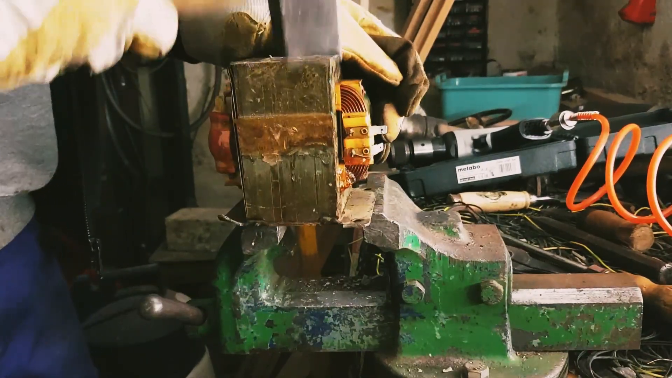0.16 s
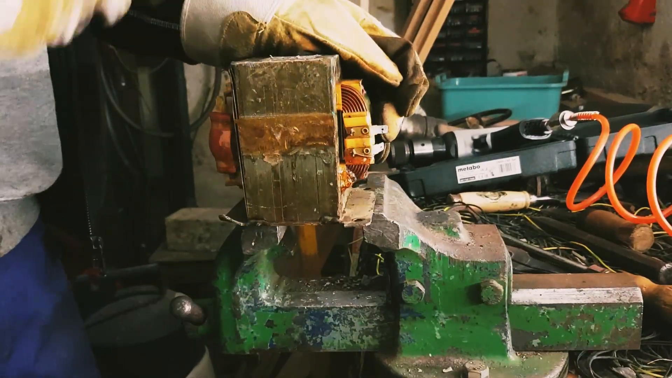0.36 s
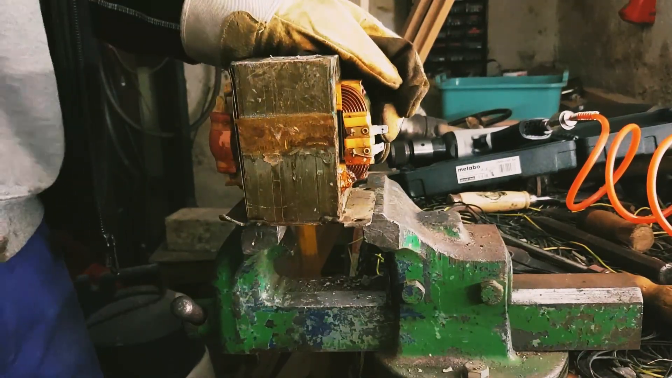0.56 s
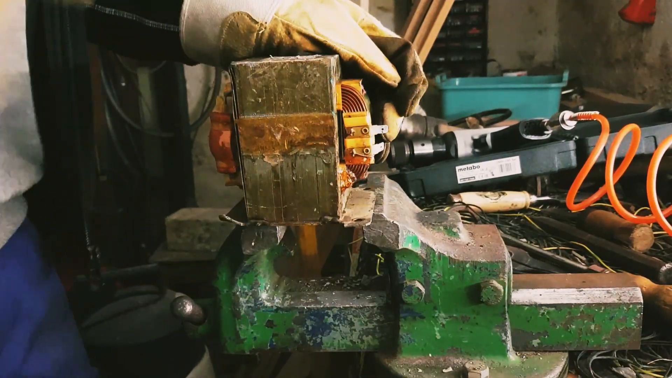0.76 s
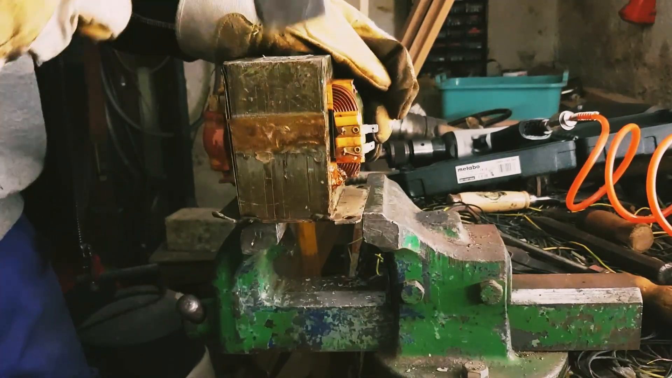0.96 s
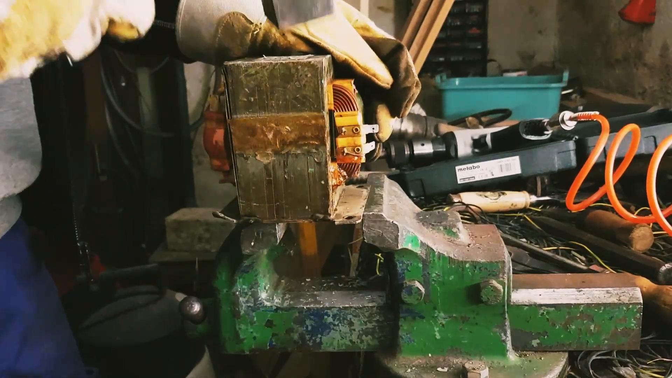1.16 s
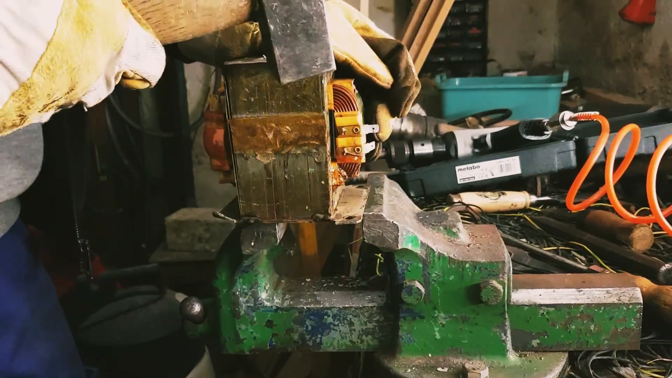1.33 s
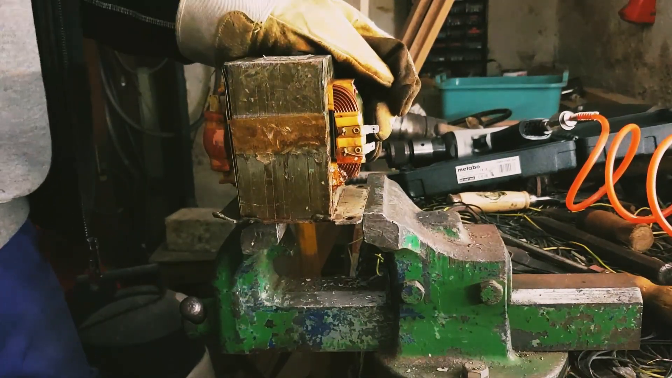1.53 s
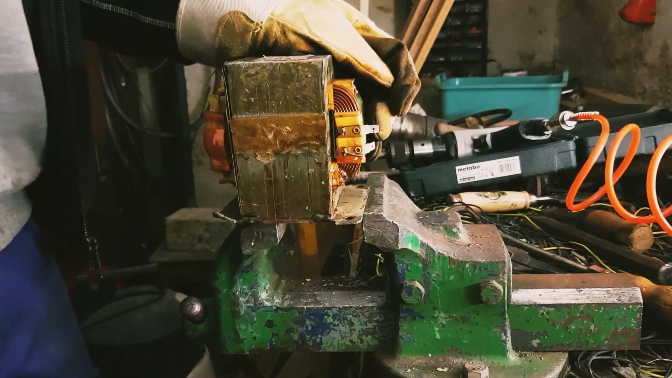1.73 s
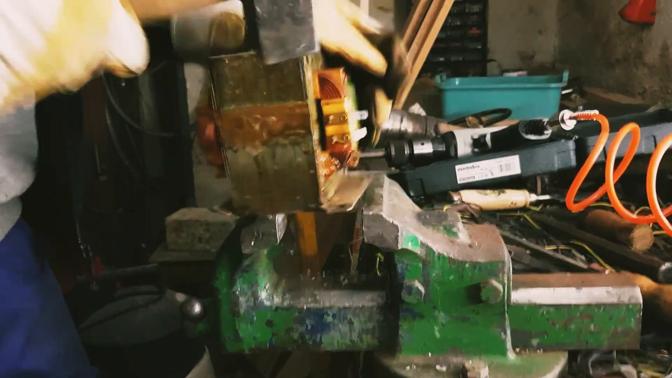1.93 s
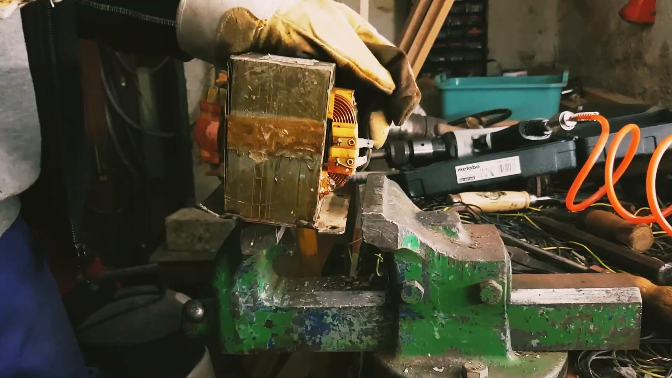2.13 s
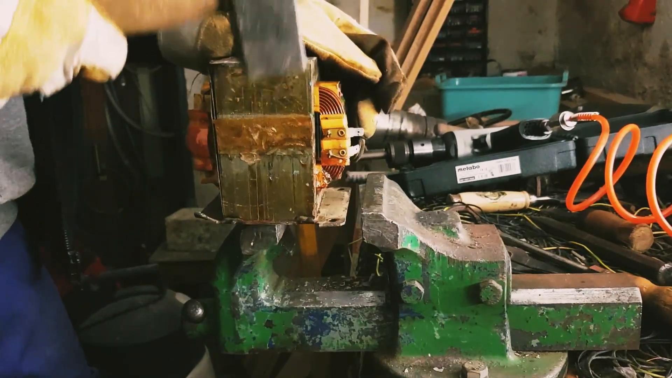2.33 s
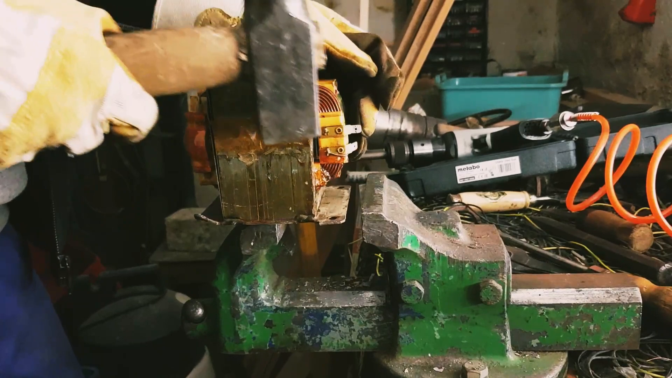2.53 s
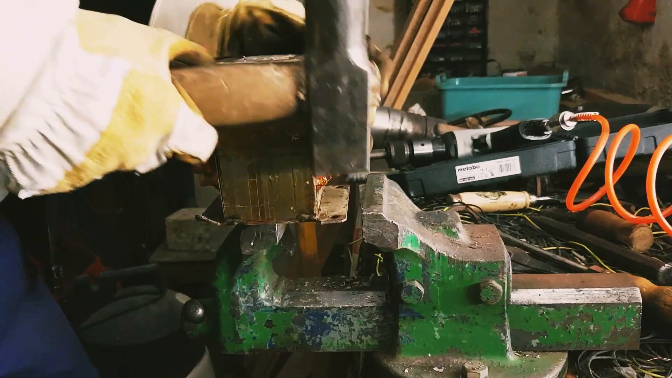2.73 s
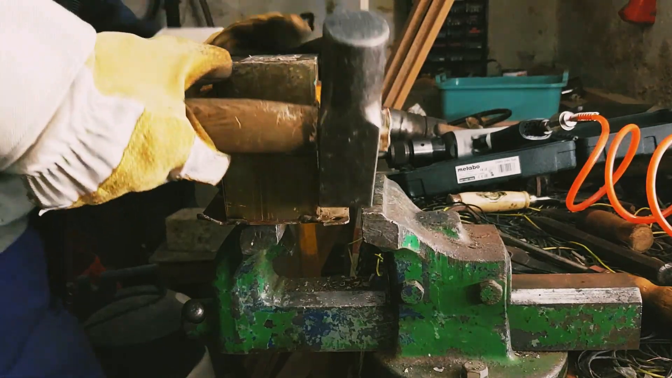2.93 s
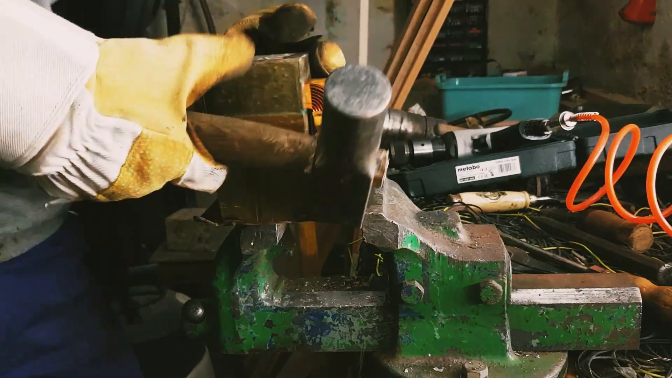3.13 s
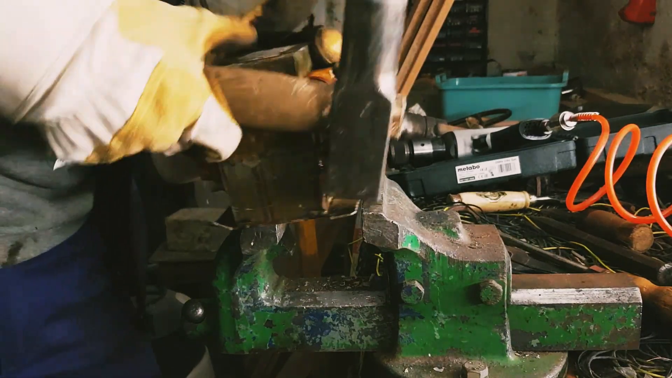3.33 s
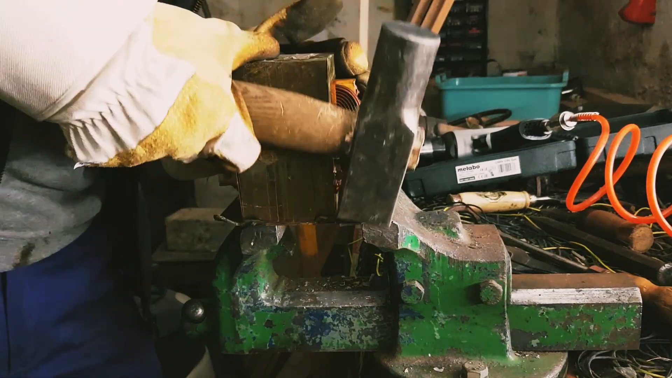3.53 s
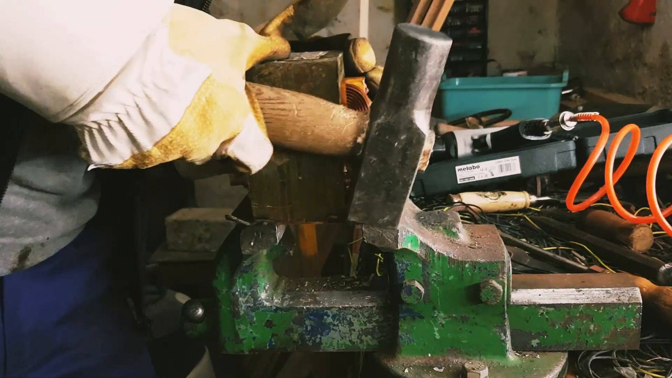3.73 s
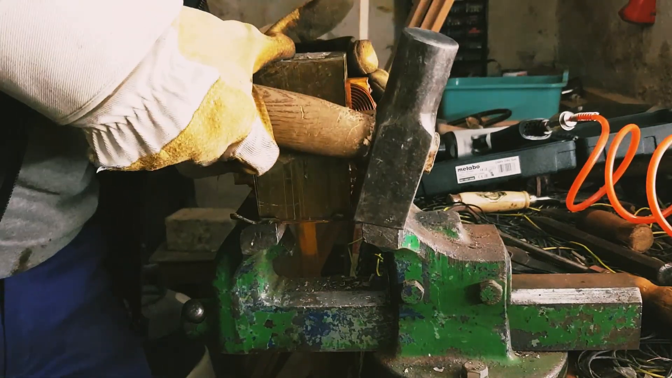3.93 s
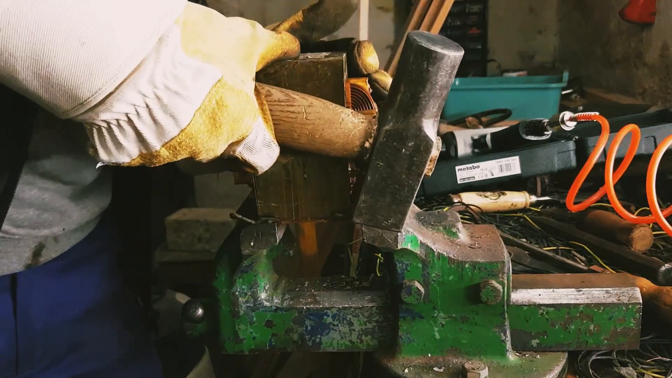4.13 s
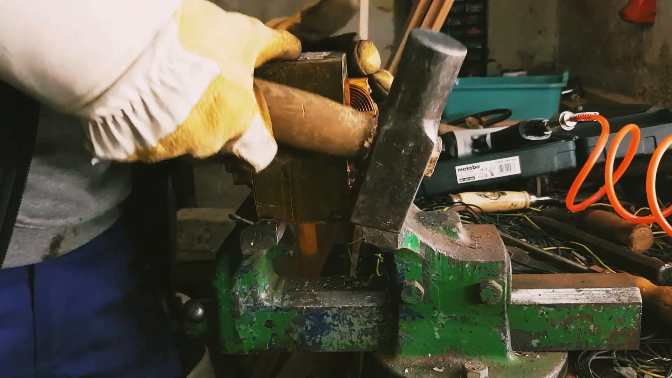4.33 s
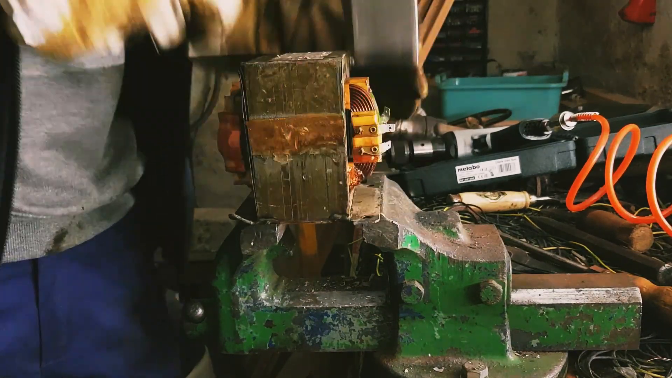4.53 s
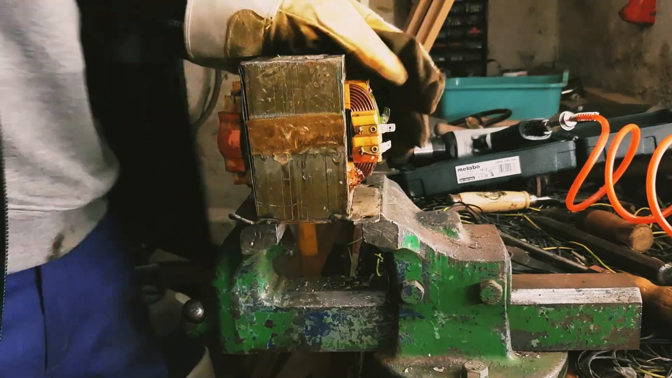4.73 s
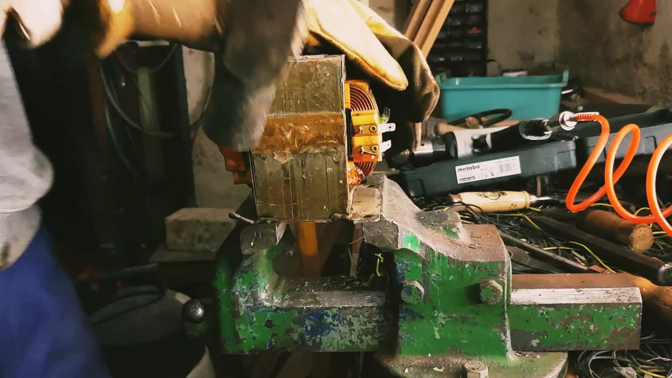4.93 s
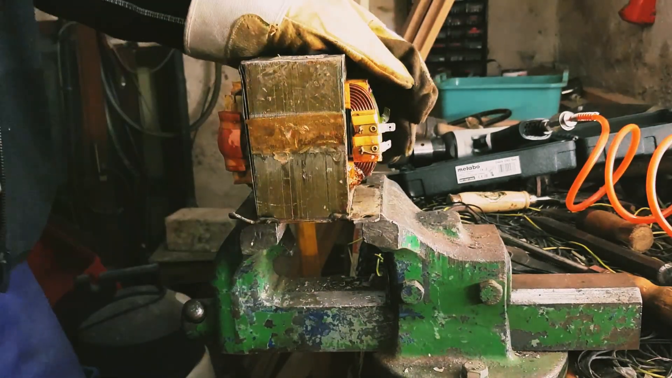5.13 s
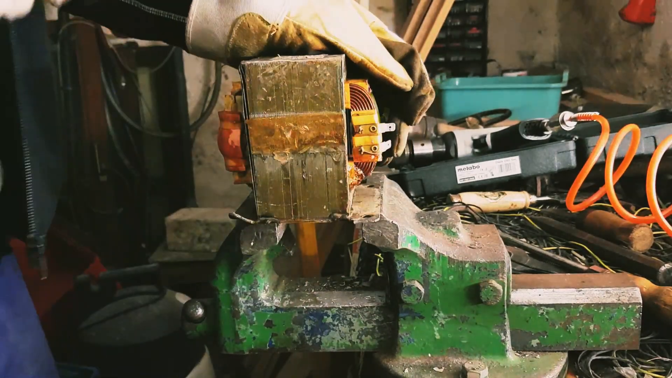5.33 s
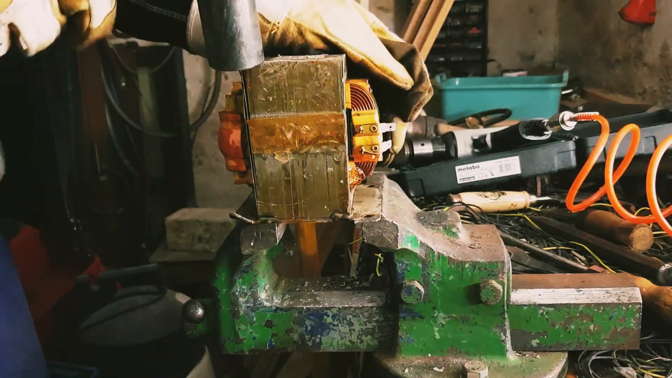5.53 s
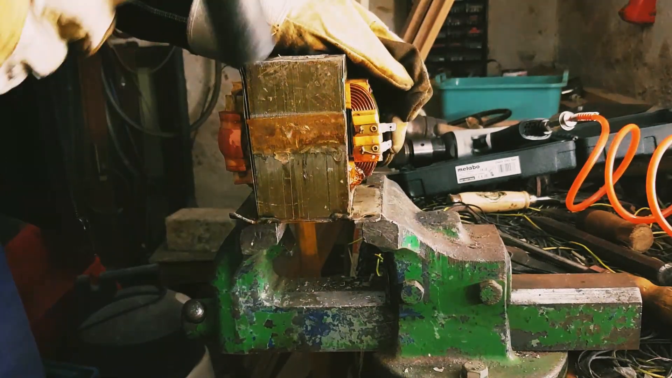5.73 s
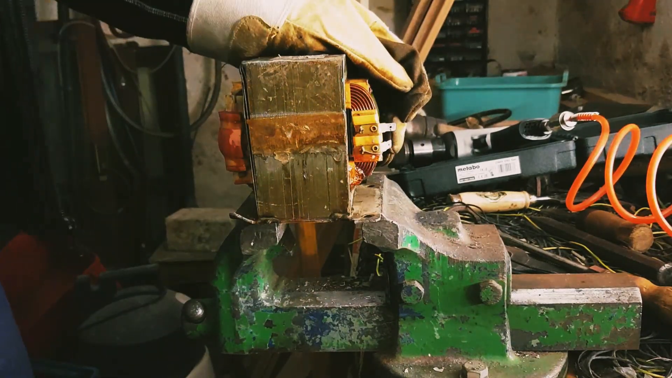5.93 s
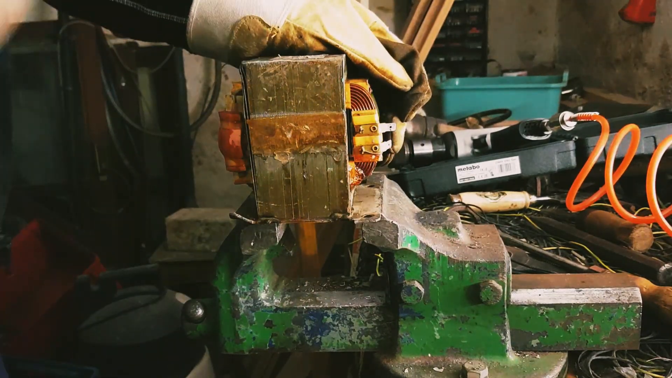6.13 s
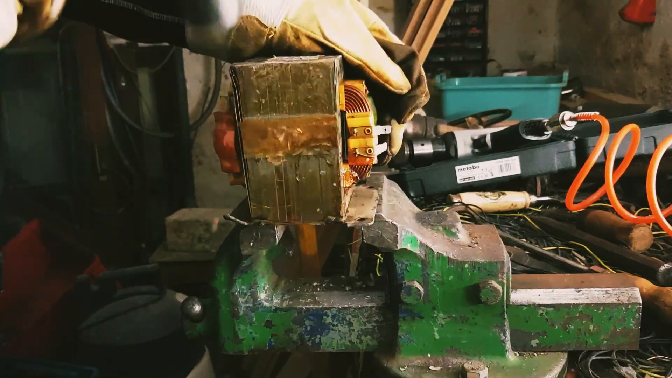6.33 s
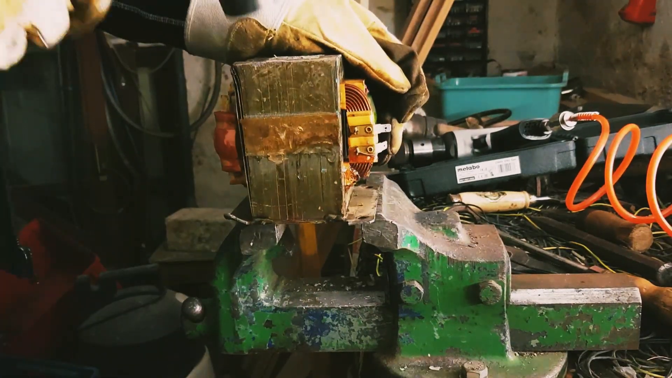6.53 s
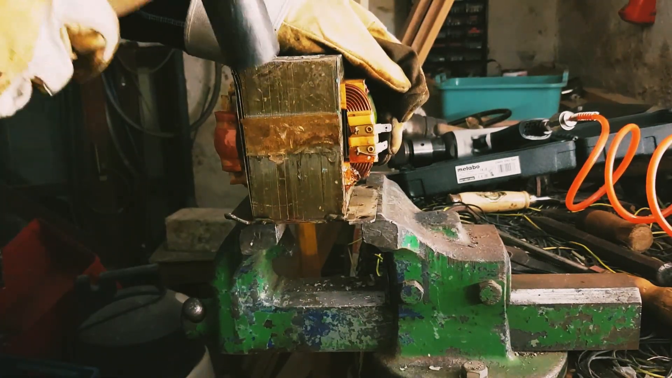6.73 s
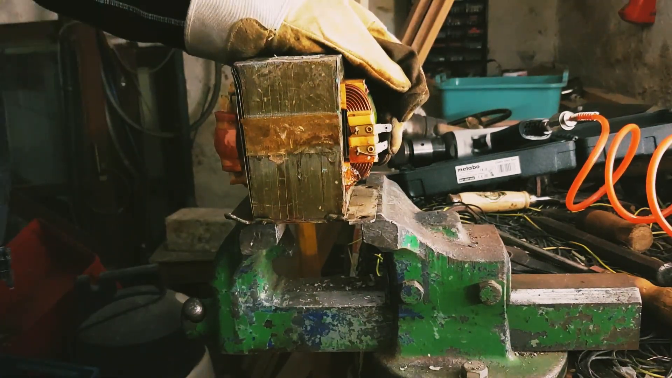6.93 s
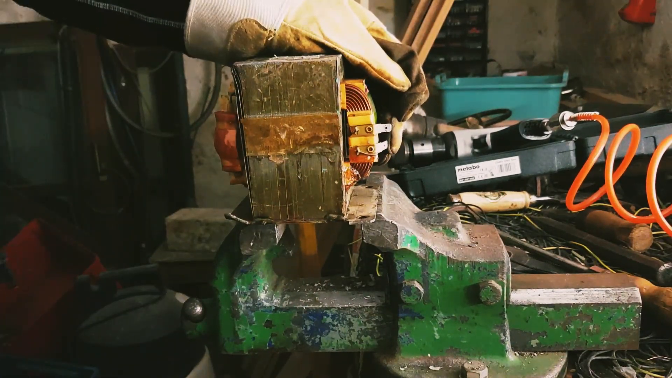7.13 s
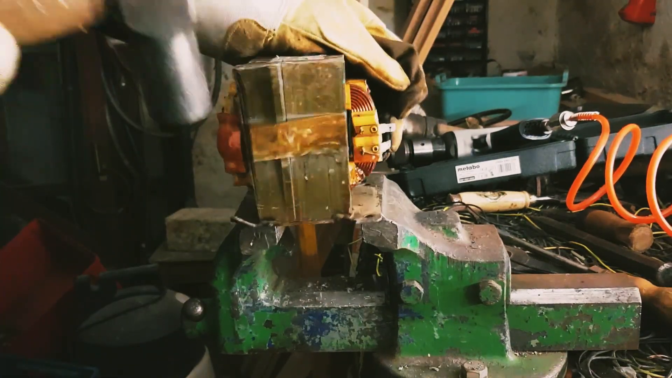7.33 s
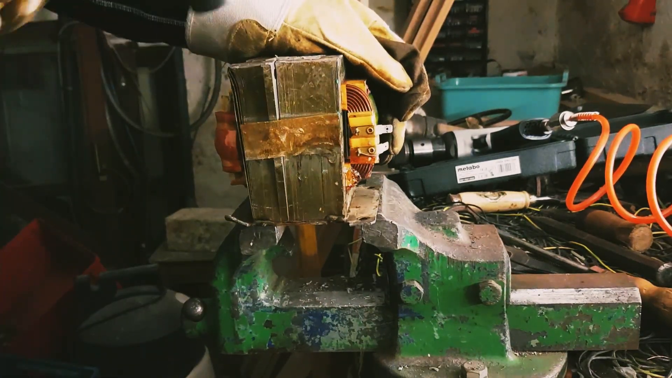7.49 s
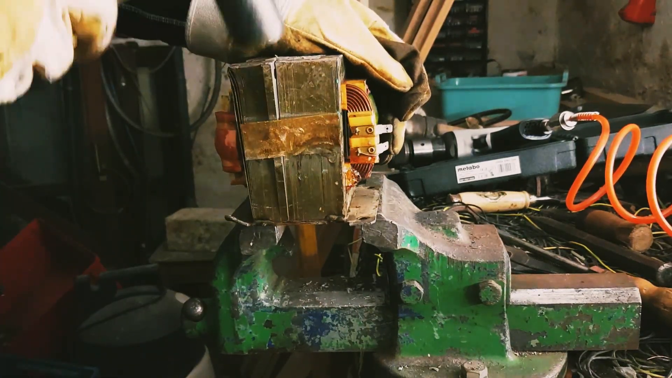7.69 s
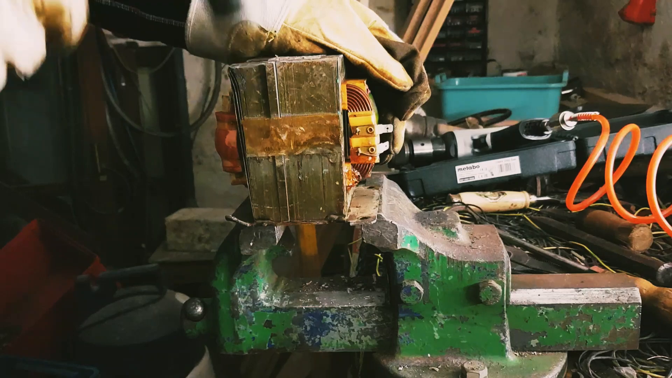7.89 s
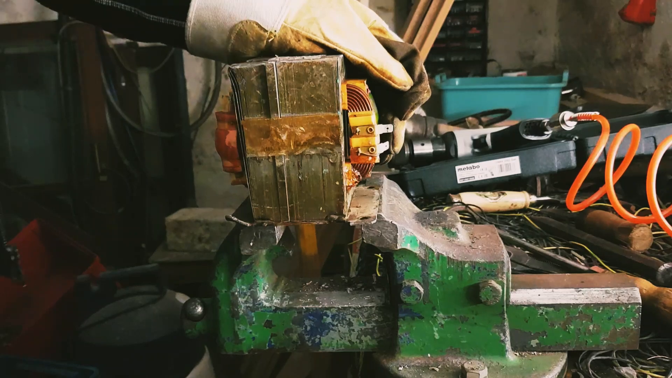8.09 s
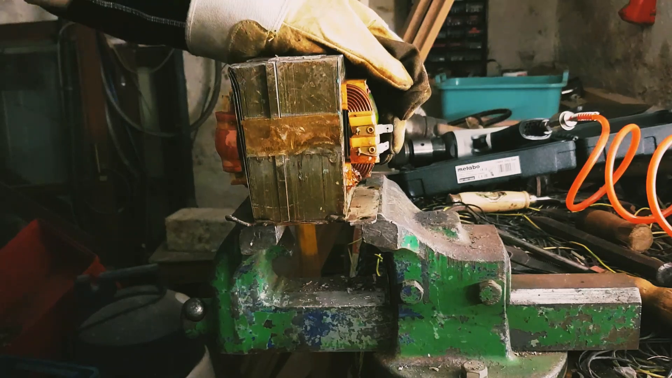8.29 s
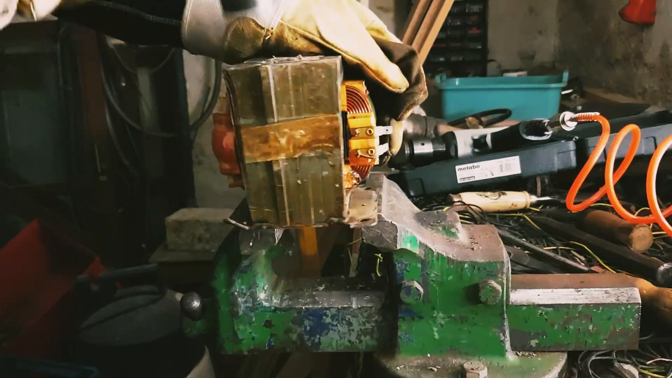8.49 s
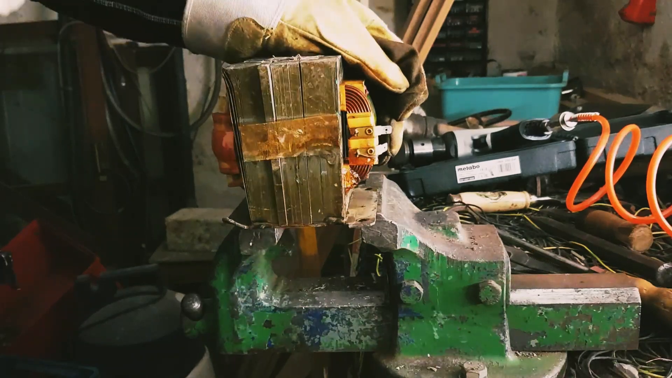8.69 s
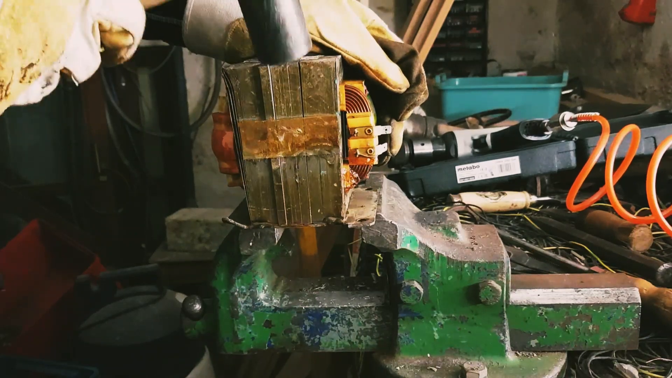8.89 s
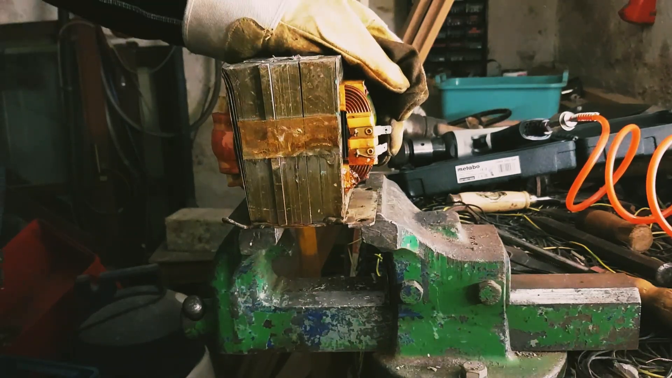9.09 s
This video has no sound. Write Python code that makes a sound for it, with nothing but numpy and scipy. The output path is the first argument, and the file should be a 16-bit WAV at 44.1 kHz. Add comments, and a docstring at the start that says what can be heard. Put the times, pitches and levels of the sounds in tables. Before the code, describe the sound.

Close stereo sound, slightly right of centre, of hammering on varnished steel sheets in a vise. Each loud blow cracks, clangs and sets the bench booming, with a short room tail. Midway the work is shifted quietly with soft bumps, knocks, glove friction and cloth rustle. Louder blows return about a second apart, with small steel touches between, over an almost silent room.

```python
"""Cracking, ringing, booming blows, in runs about one a second, with light steel taps between them.
A hammer strikes a laminated transformer core in a bench vise; midway a gloved hand shifts the work and a sleeve rustles.
Contacts are shaped band noise (dense damped modes) plus decaying sinusoids (separate modes of steel and bench).
Friction is noise under swelling strokes; a very quiet room lies beneath, and a limiter flattens the first instants."""
import sys
import numpy as np
from scipy import signal
from scipy.io import wavfile

SR = 44100
rng = np.random.default_rng(int(sys.argv[2]) if len(sys.argv) > 2 else 0)


def output_pcm(signal):
    """Save a mono or channel-first signal as 16-bit PCM at the path in sys.argv[1].

    Samples are clipped to [-1, 1] before scaling.
    """
    pcm = np.clip(np.atleast_2d(signal).T, -1, 1) * 32767
    wavfile.write(sys.argv[1], SR, np.round(pcm).astype(np.int16))


N = 403515

# modes of bench and room: pitch_hz, level_db, t60_s
BOOM = [(46, -30, 1.3), (71.3, -18.5, 1.07), (84.3, -24.5, 0.72), (104, -21.5, 0.76), (112.6, -16, 0.54),
        (123.8, -24.5, 0.44), (138.1, -13.5, 0.23), (149.4, -14.5, 0.78), (160.5, -18.5, 0.6),
        (182.2, -18, 0.75), (241.7, -8, .45), (265.7, -14.5, 0.52), (333, -15.5, 0.55), (370, -16, 0.52),
        (439.7, -16.5, 0.49), (482.3, -16.5, 0.49), (625, -19.5, 0.29), (657, -19, 0.46),
        (738, -14.5, 0.38), (1032, -19, 0.15), (1274, -22.5, 0.45)]
# modes of the hammer head, some in close pairs: pitch_hz, level_db, t60_s
HEAD_MODES = [(4344, -21.5, .25), (7025, -21.5, .21), (7065, -23, .2), (8541, -26, .21), (9052, -29, .2),
              (10310, -17, .21), (10368, -18, .21), (13980, -19, .19), (14085, -15, .2), (14575, -25, .16)]
# modes of the stacked core, damped by its varnish: pitch_hz, level_db, t60_s
CORE_MODES = [(942, -18, .22), (1433, -15, .25), (1580, -19, .25), (1860, -18, .16), (2299, -19, .2),
              (2550, -20, .16), (2900, -19, .16), (3235, -21, .19), (3903, -22, .19), (4288, -24, .27),
              (11200, -25, .14)]
# relative spectrum of the work pressing or bumping on the bench: frequency_hz, density_db (per Hz)
BUMP_SPECTRUM = [(40, -20), (110, -10.5), (180, -3.5), (290, -1.5), (420, -17.5), (700, -29), (2000, -55.5),
                 (15000, -70)]
# correlation of the two sides: frequency_hz, likeness (1 = identical, 0 = independent)
LIKENESS = [(60, .96), (150, .93), (300, .7), (600, .3), (1200, .02), (4000, 0), (15000, 0)]

EDGES = np.geomspace(35, 17000, 21)  # band edges, Hz
CENTRES, WIDTHS = np.sqrt(EDGES[:-1] * EDGES[1:]), np.diff(EDGES)  # Hz
AGE = np.arange(int(1.2 * SR)) / SR  # time since a contact, s


def from_db(db):
    """Decibels to amplitude ratio: 20 dB is a factor of ten."""
    return 10 ** (np.asarray(db) / 20)


def at_hz(points, hz):
    """Interpolation on a log-frequency axis, where octaves are equal steps."""
    frequency, value = np.transpose(points)
    return np.interp(np.log(hz), np.log(frequency), value)


def fade(t60):
    """Exponential free decay, down 60 dB after t60 seconds."""
    return np.exp(-np.log(1000) * AGE / t60)


def add(out, s, sound):
    """Superposition: mix a sound in at a time, dropping what falls outside."""
    start = round(s * SR)
    first, last = max(start, 0), min(start + sound.shape[-1], N)
    out[:, first:last] += sound[:, first - start:last - start]


def placed(hz):
    """Interaural level difference: gains of left and right put the work a little to the right."""
    # frequency_hz, left_minus_right_db
    lean = [(60, -2), (150, -0.46), (300, -1.5), (1000, -3.5), (2000, -4.5), (4000, -5.5), (8000, -1.5),
            (14000, -5)]
    return from_db(at_hz(lean, hz) * np.array([[.5], [-.5]]))


def likeness(hz):
    """Correlation of left and right in a diffuse field, high only in the bass."""
    return np.clip(at_hz(LIKENESS, hz), -1, 1)


def diffuse_field():
    """Partly correlated noise as sum and difference of independent parts; each band has rms 1 before placing."""
    white = rng.standard_normal((2, 2, N))
    field = []
    for k, (hz, width) in enumerate(zip(CENTRES, WIDTHS)):
        sos = signal.butter(3, [EDGES[k], EDGES[k + 1]], "band", fs=SR, output="sos")
        # neighbouring bands take different noise
        mid, side = signal.sosfilt(sos, white[k % 2]) * np.sqrt(SR / 2 / width / 2)
        alike = likeness(hz)
        stereo = np.sqrt(1 + alike) * mid + np.sqrt(1 - alike) * side * [[1], [-1]]
        field.append(stereo * placed(hz))
    return np.array(field, dtype=np.float32)


def band_gains(spectrum, tilt_db=0):
    """Spectral shaping: unit power shared among the bands, tilted by tilt_db per octave."""
    gains = from_db(at_hz(spectrum, CENTRES) + tilt_db * np.log2(CENTRES)) * np.sqrt(WIDTHS)
    return (gains / np.linalg.norm(gains)).astype(np.float32)


def impact_shape(crack_db, crack_t60, swell_cycles, late_db, late_t60):
    """Power sum of direct crack, reverberation and late tail; low bands need longer to swell."""
    # workshop reverberation: frequency_hz, t60_s
    room_t60 = [(60, 1), (150, 0.49), (300, 0.36), (600, 0.34), (1500, 0.3), (4000, 0.28), (8000, 0.24),
                (15000, 0.21)]
    crack = from_db(crack_db) * fade(crack_t60)
    late = from_db(late_db) * fade(late_t60)
    shapes = []
    for hz in CENTRES:
        power = fade(at_hz(room_t60, hz)) ** 2 + crack ** 2 + late ** 2
        swell = 1 - np.exp(-AGE * hz / swell_cycles)
        shapes.append(np.sqrt(power) * swell)
    return np.array(shapes, dtype=np.float32)


def impact(field, shape, spectrum, tilt_db):
    """High modal density: countless damped modes, excited afresh by every contact, act as decaying noise."""
    start = rng.integers(0, N - len(AGE))
    noise = field[:, :, start:start + len(AGE)]
    envelopes = shape * band_gains(spectrum, tilt_db)[:, None]
    return np.einsum("bct,bt->ct", noise, envelopes)


def ring(modes, swell_s, spread_db, waver=0, waver_per_s=40):
    """Modal decay with chance strengths; reflections make it waver and reach the two sides out of step."""
    out = np.zeros((2, len(AGE)))
    for hz, db, t60 in modes:
        apart = np.arccos(likeness(hz)) * rng.choice([-1, 1])
        phase = rng.uniform(0, 2 * np.pi) + np.array([[0], [apart]])
        t = AGE[AGE < t60 * 4 / 3]  # followed for 80 dB of decay
        points = rng.standard_normal((2, 128, 2)) @ [1, 1j] / np.sqrt(2)
        echoes = np.array([np.interp(t * waver_per_s, np.arange(len(p)), p) for p in points])
        decaying = np.exp((2j * np.pi * hz - np.log(1000) / t60) * t)
        wave = ((np.exp(1j * phase) + waver * echoes) * decaying).real
        strength = from_db(db + spread_db * rng.standard_normal())
        out[:, :len(t)] += strength * placed(hz) * wave
    return out * (1 - np.exp(-AGE / swell_s))


def room_floor(field):
    """Stationary background noise, its sides swapped so that it leans away from the work."""
    # relative spectrum: frequency_hz, density_db (per Hz)
    floor_spectrum = [(18, -37), (30, -8.5), (88, 3), (263, -20.5), (787, -25.5), (1910, -24.5),
                      (2300, -26.5), (3880, -24), (7860, -40.5), (12600, -27), (15500, -42)]
    return from_db(-72) * np.tensordot(band_gains(floor_spectrum), field, 1)[:, ::-1]


def blows(field, boom):
    """Impulsive excitation: a full blow drives sheets, hammer head, core and bench together."""
    # the first is already dying away, the second bounces once;
    # start_s, level_db, tilt_db (brightness per octave), boom_db, head_db (both relative to the blow)
    blow_list = [(-.17, -6.5, -0.5, -1.5, 0.5), (0.83, -4, 0.14, -2.5, 0.5), (.889, -12, -1.04, -10, -6.5),
                 (1.9195, -3.5, 0, -5.5, -0.5), (5.3997, -8.5, -1.93, -7, -27), (6.219, -4.5, 0, -4.5, 0),
                 (7.246, -6.5, -0.63, -2.5, 6), (8.393, -3, -0.92, -6.5, 3.5)]
    # relative spectrum of the clang: frequency_hz, density_db (per Hz)
    clang = [(40, -28.5), (90, -13.5), (160, -1.5), (300, -1.5), (500, -4), (720, -2), (1000, -7),
             (1500, -6), (2500, -10.5), (4000, -12.5), (6000, -17), (7800, -22), (10500, -20.5),
             (14000, -20), (16000, -26)]
    out = np.zeros((2, N))
    hard = impact_shape(crack_db=10.0, crack_t60=0.023, swell_cycles=3.2, late_db=-36.5, late_t60=0.27)
    for s, db, tilt_db, boom_db, head_db in blow_list:
        head = from_db(head_db) * ring(HEAD_MODES, swell_s=.003, spread_db=2, waver=.7)
        core = from_db(-3) * ring(CORE_MODES, swell_s=.002, spread_db=2.5, waver=.7)
        sheets = impact(field, hard, clang, tilt_db)
        add(out, s, from_db(db) * (sheets + from_db(boom_db) * boom + head + core))
    return out


def struck_at(modes, favoured_hz):
    """Modal coupling: the spot that is hit feeds modes near one frequency up to 11 dB more than the rest."""
    struck = []
    for hz, db, t60 in modes:
        nearness = np.exp(-(np.log(hz / favoured_hz) / .08) ** 2)
        struck.append((hz, db + 11 * nearness, t60))
    return struck


def taps(field, soft, boom):
    """Contact angle and load: glancing, bright touches ring the core less; weight put on wakes the bench."""
    # start_s, level_db, tilt_db (brightness per octave), weight_db (on the bench), head_db, favoured_hz;
    # weight and head are relative to the touch
    tap_list = [(.208, -33, -0.34, 5, -2, 4288), (1.178, -52.5, 3.5, -18, -8, 2250),
                (1.2997, -33, -2.5, -9, -20, 1570), (2.192, -57.5, 4.5, -20, -15, 11260),
                (2.563, -54.5, 14.5, -28, -9.5, 11200), (3.124, -48.5, 15.5, -15.5, -4, 11200),
                (3.309, -63, 13.5, 7, -10, 11260), (3.504, -69, 7, -20, -15, 1433),
                (4.7549, -43.5, 1.5, -26, -27, 1860), (5.067, -43.5, 0.5, -25, -22, 2300),
                (5.7019, -48.5, 1.5, -14, -9.5, 1860), (6.659, -43, -.5, 11, -7, 2880),
                (7.519, -62, 6.5, -20, -8.5, 3900), (7.571, -61.5, 8, -22.5, -12.5, 3990),
                (7.765, -41, 6.5, 4.5, -6, 2300), (7.875, -64, 3.5, -19, -10, 3900),
                (7.942, -54.5, 1.5, -13, -12, 1880), (8.079, -65, -0.5, -19.5, -15, 3900),
                (8.673, -52.5, 9, -18.5, -7, 2870), (8.858, -44.5, -2, 3.5, -19.5, 2370)]
    # relative spectrum of steel touching the core: frequency_hz, density_db (per Hz)
    touch = [(40, -27.5), (150, 1.5), (300, -2), (700, -3.5), (1500, -4), (2600, -4), (4200, -12),
             (7000, -21), (11000, -20), (16000, -28.5)]
    # low thump as the hammer comes to rest: pitch_hz, level_db, t60_s
    thump_modes = [(171, -7, 0.58), (250, -9, 0.37)]
    core_ring_db, glancing_loss = 2, .63  # dB at zero tilt; dB lost per dB-per-octave of tilt
    boom_db, bump_db = -5.5, -3.5  # relative to the weight
    out = np.zeros((2, N))
    light = impact_shape(crack_db=6.5, crack_t60=0.033, swell_cycles=1.0, late_db=-32.5, late_t60=0.9)
    for s, db, tilt_db, weight_db, head_db, favoured_hz in tap_list:
        head = from_db(head_db) * ring(HEAD_MODES, swell_s=.002, spread_db=1.5, waver=.7)
        core = ring(struck_at(CORE_MODES, favoured_hz), swell_s=.001, spread_db=1.5, waver=.7)
        steel = head + from_db(core_ring_db - glancing_loss * tilt_db) * core
        bump = from_db(bump_db) * impact(field, soft, BUMP_SPECTRUM, 0)
        thump = ring(thump_modes, swell_s=0.012, spread_db=0)
        bench = from_db(boom_db) * boom + bump + thump
        contact = impact(field, light, touch, tilt_db)
        add(out, s, from_db(db) * (contact + from_db(weight_db) * bench + steel))
    return out


def hammer_song():
    """Contact damping: the lifted head sings on until, resting on the core, it is quickly damped."""
    # pitch_hz, level_db, t60_s
    song_modes = [(8541, -51, 3)]
    damped_s, damping_db_per_s = 0.32, 150
    damping = from_db(-damping_db_per_s * np.maximum(AGE - damped_s, 0))
    out = np.zeros((2, N))
    add(out, 0, ring(song_modes, swell_s=.001, spread_db=0) * damping)
    return out


def stroke_gain(strokes, attack_share):
    """Power addition of strokes, each swelling for a share of its length and dying away for the rest."""
    depth_db = 18.5  # a stroke starts and ends this far under its peak
    t, power = np.arange(N) / SR, 0
    share = np.clip(attack_share, .02, .98)
    for s, db, length in strokes:
        away = np.maximum((s - t) / share, (t - s) / (1 - share)) / length
        power = power + from_db(db - depth_db * np.minimum(away, 10)) ** 2
    return np.sqrt(power)


def rubbing(field, spectrum, strokes, attack_share, grain_db, catches_per_s):
    """Stick-slip friction: a hiss, roughened as the surfaces catch and let go."""
    grain = np.interp(np.arange(N) / SR * catches_per_s, np.arange(N), rng.standard_normal(N))
    hiss = np.tensordot(band_gains(spectrum), field, 1)
    return hiss * stroke_gain(strokes, attack_share) * from_db(grain_db * grain)


def glove(field):
    """Low-frequency friction of the gloved hand pressing or turning the work."""
    # peak_s, level_db, length_s
    presses = [(0, -44, 1.17), (0.548, -63.5, .45), (2.299, -69, .6), (3.35, -62, .35), (3.577, -63, 0.27),
               (3.809, -63.5, .2), (4.165, -63.5, 0.38), (4.452, -63.5, 0.29), (5.6, -63, 1.15)]
    return rubbing(field, BUMP_SPECTRUM, presses, attack_share=0.57, grain_db=6.0, catches_per_s=43)


def sleeve(field):
    """Broadband cloth friction, loudest where the arm moves fastest."""
    # peak_s, level_db, length_s
    arm_moves = [(2.4, -71, .4), (3.3, -73, 1.6), (4.45, -64.5, .3), (4.682, -60.5, 0.38), (4.84, -60, .3),
                 (5.0, -55, 0.34), (5.225, -44.5, 0.15), (5.42, -56, .35), (5.75, -62.5, .9),
                 (6.22, -62, .3), (9.1, -72, 1.2)]
    # relative spectrum: frequency_hz, density_db (per Hz)
    cloth = [(40, -16.5), (150, -1.5), (300, -7.5), (600, -6), (1200, -5), (2500, -7.5), (4000, -8.5),
             (7000, -18), (11000, -15.5), (15000, -19)]
    return rubbing(field, cloth, arm_moves, attack_share=.5, grain_db=2.5, catches_per_s=350)


def sheet_flicks():
    """Free-edge vibration: a loose sheet at the edge of the stack is flicked and rings briefly."""
    # start_s, level_db
    flicks = [(2.191, -51), (4.7556, -44), (5.074, -37)]
    # pitch_hz, level_db, t60_s
    sheet_modes = [(10200, -12, .05), (10700, -9, .06), (11240, -5, .16), (11450, -9, .08),
                   (12400, -11, .06), (13870, -15, .12)]
    out = np.zeros((2, N))
    for s, db in flicks:
        add(out, s, from_db(db) * ring(sheet_modes, swell_s=.002, spread_db=1, waver=.9, waver_per_s=250))
    return out


def knocks(field):
    """Coupled impact: the work shifts with a dull knock and rings the vise jaws."""
    # start_s, level_db, tilt_db (brightness per octave)
    knock_list = [(2.668, -55, 2), (2.767, -60.5, -2.5), (2.988, -60, 8.5), (3.062, -63, 5),
                  (3.367, -53.5, -6.5), (3.596, -58.5, -4.5), (3.882, -53, -2.5), (4.291, -54.5, -1),
                  (4.385, -58.5, -5), (4.449, -59.5, -5.5)]
    # relative spectrum: frequency_hz, density_db (per Hz)
    knock_spectrum = [(40, -9.5), (250, 8), (600, 5), (1000, 7), (1500, -3.5), (1850, -2.5), (2300, -15.5),
                      (15000, -51)]
    # pitch_hz, level_db, t60_s
    jaw_modes = [(624, -10, .2), (759, -8, .22), (915, -7, .13), (975, -9, .17), (1240, -11, .2),
                 (1780, -13, .12), (1890, -16, .14)]
    out = np.zeros((2, N))
    short = impact_shape(crack_db=11, crack_t60=0.019, swell_cycles=0.41, late_db=-35, late_t60=0.793)
    for s, db, tilt_db in knock_list:
        jaws = from_db(-2) * ring(jaw_modes, swell_s=0.00054, spread_db=3.0, waver=0.17)
        add(out, s, from_db(db) * (impact(field, short, knock_spectrum, tilt_db) + jaws))
    return out


def bumps(field, soft):
    """Soft-contact low-pass: a gentle bump of the work wakes only the bench's lowest modes."""
    # start_s, level_db
    bump_list = [(2.779, -57), (3.424, -39), (3.843, -44.5), (4.077, -56.5), (4.374, -58), (4.819, -54)]
    out = np.zeros((2, N))
    low_boom = ring(BOOM[:2], swell_s=.016, spread_db=0)
    for s, db in bump_list:
        add(out, s, from_db(db) * (impact(field, soft, BUMP_SPECTRUM, 0) + low_boom))
    return out


def skid(field):
    """High-frequency sliding friction of the hammer head skidding along the core."""
    # peak_s, level_db, length_s
    skids = [(3.14, -46.5, 0.1), (3.208, -50.5, 0.074)]
    # relative spectrum: frequency_hz, density_db (per Hz)
    scrape = [(1180, -25), (2000, -27), (4630, -19), (6640, -10), (7170, -10), (12300, -2), (15500, -1.5)]
    return rubbing(field, scrape, skids, attack_share=0.097, grain_db=3.0, catches_per_s=460)


def scene():
    """Superposition of hammering, handling and friction over a very quiet room."""
    field = diffuse_field()
    soft = impact_shape(crack_db=5, crack_t60=0.15, swell_cycles=2.1, late_db=-26.5, late_t60=0.59)
    boom = ring(BOOM, swell_s=.016, spread_db=0)  # the same for every blow and tap
    hammering = blows(field, boom) + taps(field, soft, boom) + hammer_song()
    handling = sheet_flicks() + knocks(field) + bumps(field, soft)
    friction = glove(field) + sleeve(field) + skid(field)
    return room_floor(field) + hammering + handling + friction


def limiter(x, ceiling_db, release_db_per_s, attack_s):
    """Gain reduction: peaks over the ceiling pull the gain down fast; it recovers at a steady dB rate."""
    over = np.maximum(20 * np.log10(np.abs(x).max(axis=0) + 1e-9) - ceiling_db, 0)
    recovery = release_db_per_s * np.arange(N) / SR
    held = np.maximum.accumulate(over + recovery) - recovery
    pole = np.exp(-1 / (attack_s * SR))
    reduction_db = signal.lfilter([1 - pole], [1, -pole], held)
    return x * from_db(-reduction_db)


def record(dry):
    """Limiting, soft saturation that rounds the peaks, and a steep low-pass."""
    limited = limiter(dry, ceiling_db=-1.0, release_db_per_s=217.5, attack_s=0.00015)
    rounded = limited / (1 + limited ** 4) ** (1 / 4)
    top_cut = signal.ellip(10, .2, 80, 15700, fs=SR, output="sos")  # order, ripple dB, stop dB, Hz
    return signal.sosfilt(top_cut, rounded)


dry = scene()
out = record(dry)
output_pcm(out)
```